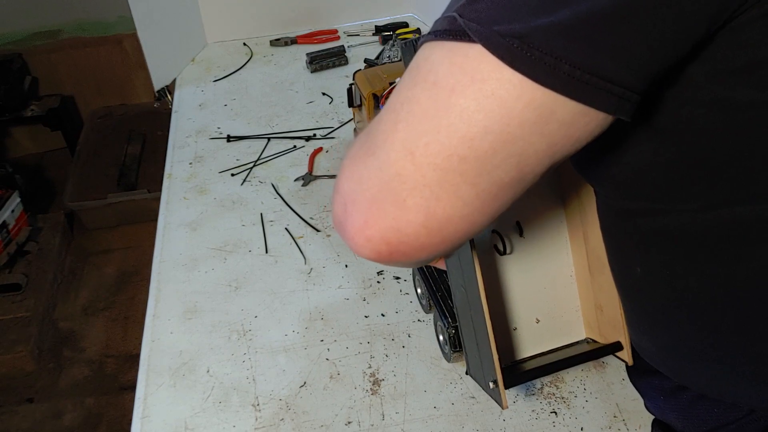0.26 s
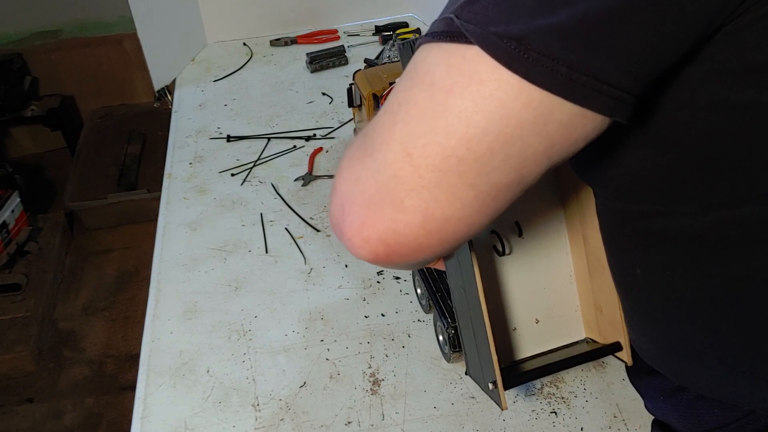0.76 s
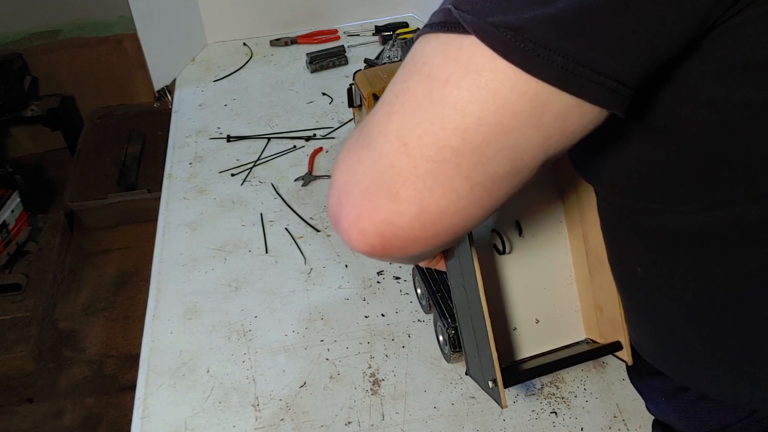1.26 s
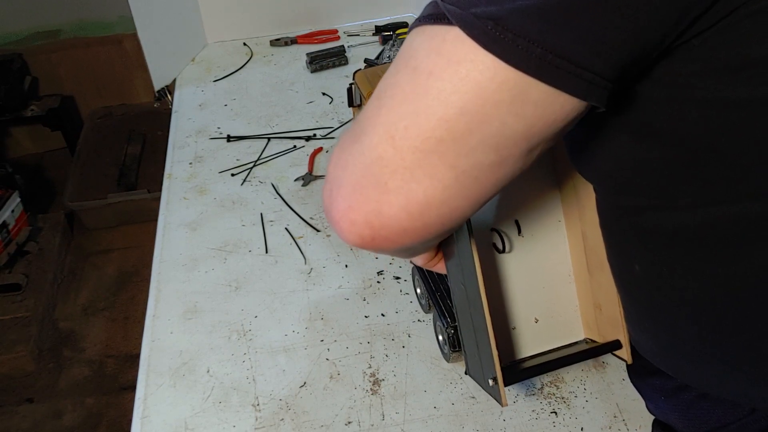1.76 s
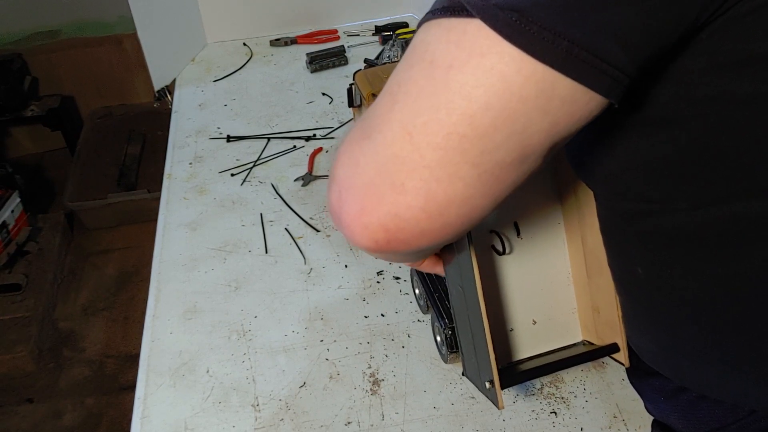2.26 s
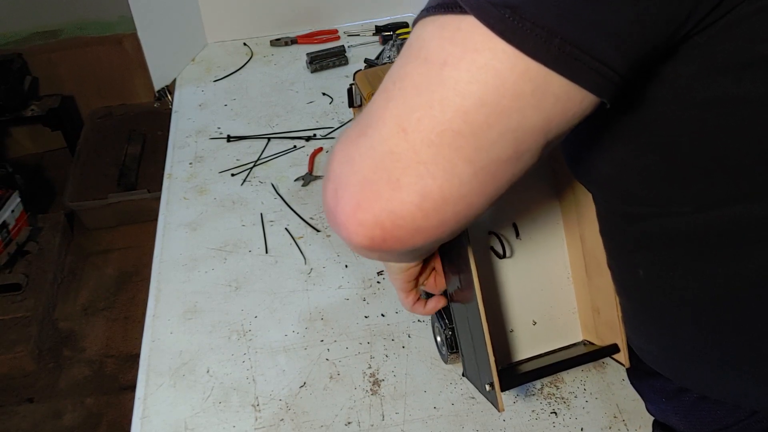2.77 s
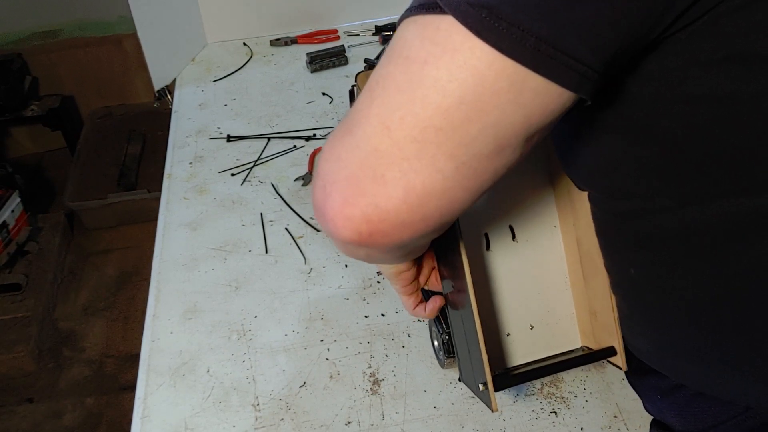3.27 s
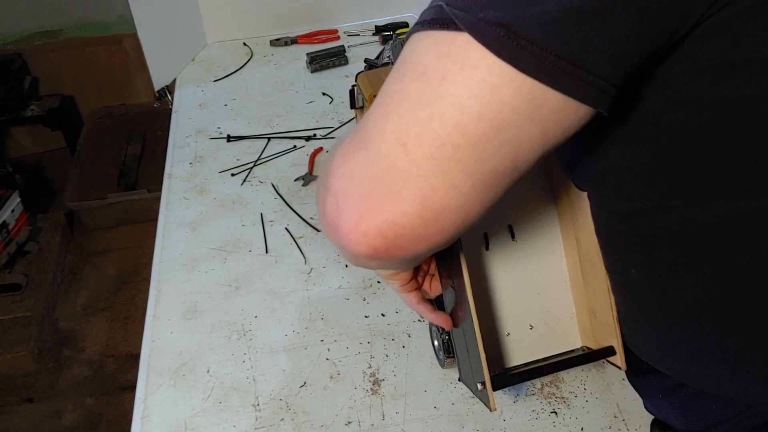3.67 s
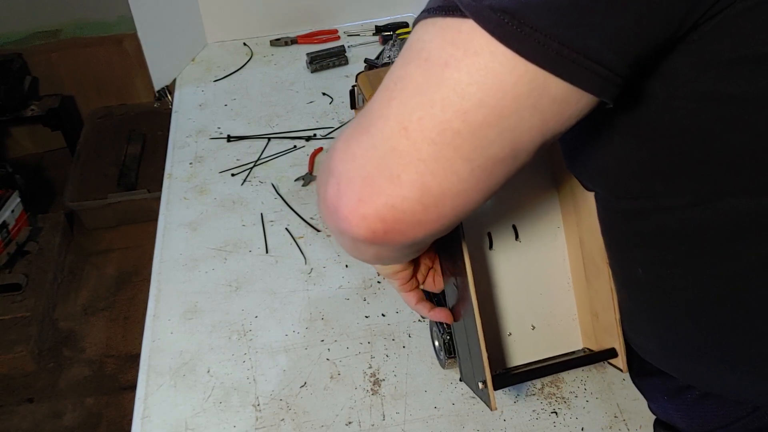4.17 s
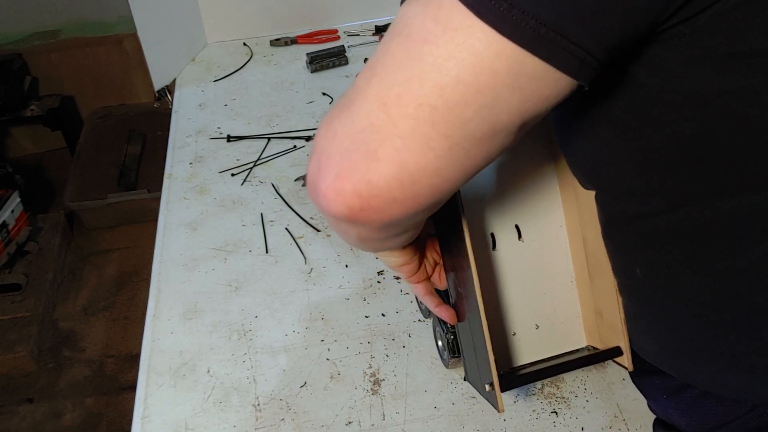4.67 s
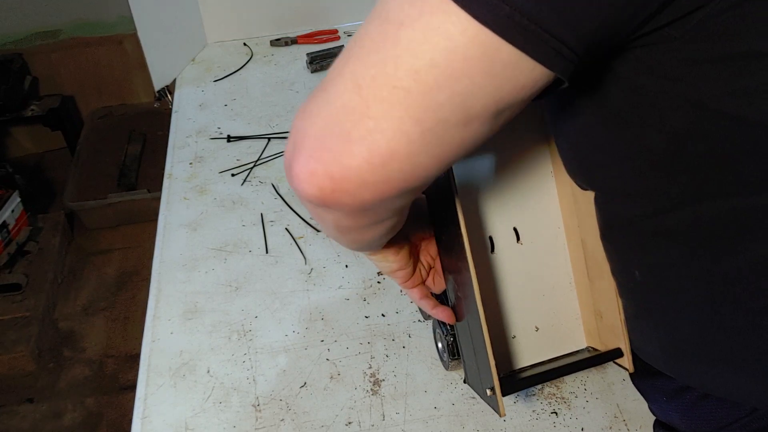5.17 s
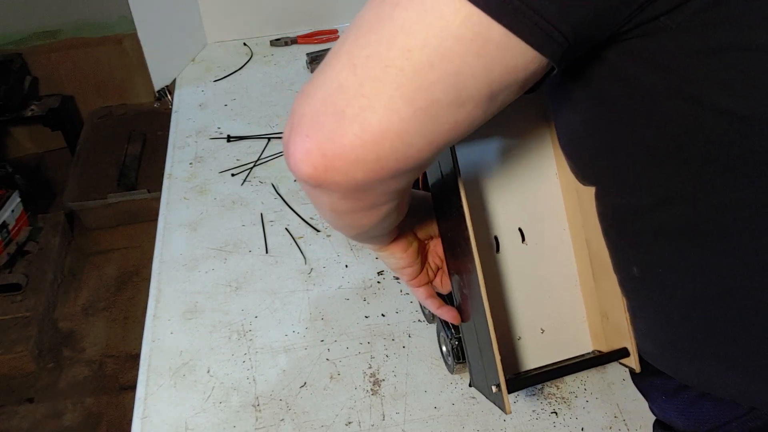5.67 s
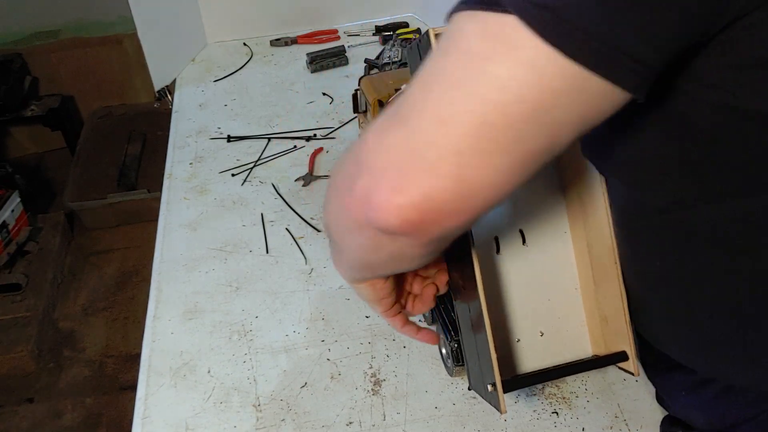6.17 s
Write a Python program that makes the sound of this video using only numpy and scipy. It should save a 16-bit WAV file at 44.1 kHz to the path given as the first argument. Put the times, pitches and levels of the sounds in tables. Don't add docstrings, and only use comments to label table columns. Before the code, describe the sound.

Very close, in a small room with faint hiss and short, cut-off tails. At 0 s a fast nylon zip lasts under a tenth of a second, followed by hard single clicks at 0.1 and 0.24. Light rubbing and a soft box knock fill the gap. From 0.8 to 1.25 a bright ratchet pull starts haltingly, runs fast, then slows tooth by tooth. Clicks at 1.4 and 1.5, a quick cluster at 1.7 and a hollow clack at 1.8 follow; another snap comes at 2.1, then faint finger rubs. At 2.86 the hardest zip bursts for about 0.15 s, squealing up and down over a low bench thump. Afterwards it is quiet: clicks around 3.75, a woody knock at 4.2, small rattles and arm thuds until 5.3. A short hollow scrape with three clacks comes at 5.36, then sparse rubs and ticks to 6.4.

```python
import sys
import numpy as np
from scipy import signal
from scipy.fft import rfft, irfft
from scipy.io import wavfile
from scipy.ndimage import uniform_filter1d, map_coordinates

SR = 44100
rng = np.random.default_rng(int(sys.argv[2]) if len(sys.argv) > 2 else 0)


def transcribe(signal):
    frames = np.atleast_2d(signal).T
    limited = np.clip(frames, -1, 1)
    pcm = np.round(limited * 32767).astype(np.int16)
    wavfile.write(sys.argv[1], SR, pcm)


def rack_gain(trim_db):
    fader = np.asarray(trim_db, float)
    return 10 ** (fader / 20)


N = 282681

# (time [s], rate [teeth/s], snap [dB], strain on truck [dB])
FULL_SPEED_PULLS = [
    [(2.9048, 320, -12, -12), (2.925, 334, -11, -12), (2.945, 300, -14, -14), (2.965, 264, -16, -13),
     (2.99, 204, -27, -8)],
]
# (frequency [Hz], density [dB/Hz])
SNAP_SPECTRUM = [(2530, -54.5), (4300, -17), (5240, -4.5), (5860, -8), (6410, -10.5), (6930, -1),
                 (7750, -4.5), (8110, -1.5), (9440, -13.5), (11500, -30.5), (15000, -53), (22000, -120)]
FIZZ_SPECTRUM = [(6350, -33), (10800, 0), (13800, -4), (15100, -6), (16000, -8)]
SHELL_SPECTRUM = [(620, -39.5), (1050, -14), (1090, -4.5), (1420, 1), (2110, 0), (2540, 0), (3020, -0.5),
                  (4800, -3.5), (6240, -28), (10600, -120)]
BOX_SPECTRUM = [(150, -44), (250, -15), (300, -20), (414, -3.5), (453, -4.5), (623, -8), (673, -7.5),
                (789, -5), (908, -6.5), (1150, -18.5), (1500, -59), (2530, -120)]
SKIN_SPECTRUM = [(2530, -48), (4300, -18.5), (5700, -11), (6140, -10.5), (7630, -1), (10100, -21.5),
                 (11100, -35.5), (13000, -43.5)]
SWAY_SPECTRUM = [(12, -38.5), (20, -5), (54, 0.5), (65, 1), (81, -8), (110, -9), (140, -30.5), (240, -120)]
THUD_SPECTRUM = [(56, -43), (95, -18), (161, 2.5), (225, 1), (269, -12), (320, -1), (420, -32), (700, -120)]
HISS_SPECTRUM = [(60, -31.5), (100, -5.5), (400, -8.5), (1500, -14.5), (5000, -21.5), (7600, -6),
                 (9500, -15), (16000, -19)]
# (frequency [Hz], width [Hz], gain [dB])
NYLON_MODES = [(6150, 200, 5), (6500, 500, 7), (7280, 500, 3), (7900, 300, 0), (9600, 400, 6)]
PLASTIC_MODES = [(1466, 90, 3), (1740, 37, 6.5), (2170, 100, 5), (2977, 74, 5), (3900, 78, 5)]
PLY_MODES = [(450, 20, 4), (530, 40, 3), (681, 30, 4), (887, 35, 4)]
# (delay [s], level [dB])
ECHOES = [(.0024, -9), (.0045, -4), (.009, -7), (.0135, -9), (.021, -12)]
# (time [s], shell [Hz], box [Hz])
GRIP = [(0.03, 4280, 570), (0.12, 3100, 880), (0.3, 3950, 473), (0.67, 1744, 640), (0.83, 4610, 452),
        (0.95, 3950, 634), (1.08, 4170, 517), (1.22, 5000, 670.4), (1.4, 1740, 549), (1.53, 4150, 560),
        (1.72, 1690, 530), (1.951, 1550, 694), (2.11, 3200, 970), (2.4, 3250, 483), (2.66, 1794, 444),
        (2.895, 4080, 462), (2.945, 1992, 931.3), (3.0, 1900, 458.4), (3.5, 3540, 400), (3.718, 4010, 455),
        (3.778, 3540, 872), (4.0, 1914, 557), (4.1, 2500, 600), (4.19, 1670, 596), (4.55, 1682, 491),
        (4.8, 3045, 1127), (4.92, 1705, 530), (5.0, 1460, 907), (5.09, 1676, 446.5), (5.37, 1397, 573.5),
        (5.57, 3900, 600), (5.65, 1600, 600), (5.74, 3800, 700), (6.0, 2100, 500), (6.2, 3000, 450)]
# (time [s], frequency [Hz])
STRAP_RING = [(0.03, 7350), (.24, 7250), (.5, 7600), (.95, 7830), (1.03, 7860), (1.09, 7550), (1.17, 7480),
              (1.4, 7500), (1.75, 7850), (2.1, 7850), (2.32, 7500), (2.55, 7400), (2.87, 7500),
              (2.93, 7950), (2.96, 7400), (3.6, 7600), (4.1, 7400), (4.9, 7500), (5.37, 7800), (5.57, 7850),
              (5.64, 8150), (5.76, 8600), (6.02, 7400), (6.38, 7800)]
# (start [s], end [s])
TAUT_PULLS = [
    (.86, 1.25),
]
# (time [s], snap peak [dB], box, shell, fizz re snap [dB])
SINGLE_TEETH = [(0, -9, -25, -15, -26), (0.1093, -5, -22, -16, -29), (0.236, -2, -21, -16, -34),
                (0.8132, -7.5, -26, -15, -33), (0.8749, -1.5, -32, -21, -29),
                (1.3853, -10.5, -9.5, -8.5, -32), (1.5131, -10, -22, -12, -42),
                (1.6883, -10, -16, -14, -38), (1.7143, -11, -13, -14, -30), (1.7376, -8.5, -18, -18.5, -22),
                (1.7634, -7.5, -17, -15, -22), (1.8182, -27, -3.5, -8, -31),
                (2.1039, -13, -33.5, -17.5, -35), (2.8556, -3, -23, -19, -31),
                (3.7114, -27, -23, -11.5, -29), (3.7531, -10.5, -15, -13.5, -30),
                (3.7998, -10.5, -21, -13.5, -28), (3.8062, -17, -21, -15, -30),
                (3.8202, -19, -15, -25.5, -30), (5.3517, -18.5, -8, -13.5, -28),
                (5.3695, -22, -6, -13, -33), (5.3875, -23, -6, -13, -33)]
# (time [s], snap [dB], strain on truck [dB], fizz re snap [dB])
RUNNING_TEETH = [(0.0016, -8, -23, -22), (0.0059, -8, -22, -22), (0.0106, -8, -21, -22),
                 (0.0157, -8, -21, -22), (0.0194, -9, -20, -22), (0.0235, -9, -20, -22),
                 (0.0277, -8, -19, -22), (0.0343, -9, -19, -22), (0.0389, -9, -18, -22),
                 (0.0445, -13, -18, -22), (0.0499, -13, -17, -22), (0.0525, -13, -17, -22),
                 (0.0581, -12, -17, -22), (0.0628, -13, -16, -22), (0.9767, -6, -31, -19),
                 (0.987, -8, -30, -19), (0.997, -6, -30, -19), (1.0072, -6, -29, -19),
                 (1.0151, -6, -29, -19), (1.0225, -8, -28, -19), (1.0276, -5, -28, -19),
                 (1.0324, -5, -28, -19), (1.0378, -4, -28, -19), (1.0424, -3, -27, -19),
                 (1.0485, -6, -27, -19), (1.0589, -8, -26, -19), (1.0685, -5, -25, -19),
                 (1.0769, -4, -24, -19), (1.0874, -4, -22, -19), (1.0925, -7, -22, -19),
                 (1.0971, -3, -22, -19), (2.8598, -7, -20, -22), (2.8641, -6, -18, -22),
                 (2.8683, -7, -17, -22), (2.8726, -6, -15, -22), (2.8762, -8, -14, -22),
                 (2.8797, -6, -13, -22), (2.8837, -8, -13, -22), (2.8878, -6, -13, -22),
                 (2.8905, -7, -13, -22), (2.8946, -9, -12, -22), (2.8975, -9, -12, -22),
                 (2.9015, -10, -12, -22)]
# (time [s], snap peak [dB])
STALLING_TEETH = [(0.9133, -6.5), (0.9255, -7.5), (0.934, -6), (0.9504, -6), (0.9654, -5.5), (1.1084, -3.5),
                  (1.1183, -4), (1.1325, -3.5), (1.1471, -4), (1.1647, -2), (1.1863, -4.5), (1.2038, -4.5),
                  (1.2186, -4), (1.2368, -3.5)]
# (time [s], snap peak [dB], box, shell re snap [dB])
TICKS = [(0.4022, -40.5, -10, -19.5), (0.472, -46.5, -14, -17.5), (0.8024, -21, -9, -9),
         (2.1425, -27.5, -24.5, -34), (2.2811, -34, -26, -17), (2.4134, -43.5, -34.5, -35),
         (2.5226, -44.5, -10, -16.5), (3.6172, -31.5, -31.5, -15.5), (3.6546, -30, -38, -28),
         (4.241, -37, -13, -11), (5.5605, -45.5, -17, -20), (4.33, -52, -25, -25), (6.341, -52, -25, -25),
         (5.7177, -39.5, -28.5, -20), (5.747, -43, -17, -25), (5.9743, -38.5, -19, -16),
         (5.9985, -30, -22, -15.5), (6.0595, -39.5, -18, -21), (6.3752, -33, -33.5, -29)]
# (time [s], box peak [dB], shell re box [dB])
KNOCKS = [(0.6589, -38, -9), (1.9914, -54, -2), (2.6478, -52.5, -7), (4.1751, -28, -12.5),
          (4.3985, -51.5, -21.5), (4.6965, -41.5, -31), (4.8356, -38.5, -9), (4.9187, -37.5, -8),
          (4.9864, -42, -25), (5.086, -62, 4), (5.2864, -48, -14), (5.954, -56, -3)]
# (time [s], hold [s], sway [dB], thud [dB])
LEANS = [(0.0, 0.037, -65, -50), (0.237, 0.017, -59.5, -55), (0.38, 0.022, -61.5, -72.5),
         (0.815, 0.087, -75.5, -65), (1.04, 0.045, -79, -49.5), (1.191, .03, -56, -59),
         (1.385, 0.015, -67, -54), (1.723, 0.086, -64.5, -53), (1.993, 0.07, -68, -66),
         (2.3, 0.044, -74, -73.5), (2.899, .08, -65, -46.5), (2.986, 0.072, -51, -44.5),
         (3.836, 0.028, -63.5, -58), (4.185, 0.022, -66, -62), (4.43, 0.0089, -68, -59.5),
         (4.77, .05, -49.5, -58.5), (5.432, 0.012, -58, -46), (5.597, .05, -59.5, -81),
         (5.82, 0.023, -71.5, -60), (6.108, .02, -60.5, -73.5), (6.4, .02, -71.5, -69)]
# (time [s], hold [s], hiss [dB], shell, box re hiss [dB])
SLIDES = [(0.358, 0.011, -51.5, -19, -0.5), (0.479, .02, -58, -15, -8), (0.788, .01, -65, -7, 2),
          (1.996, 0.12, -53.5, -6, -7), (2.099, .01, -42, -20, -17), (2.276, 0.076, -44.5, -14.5, -13),
          (2.526, 0.046, -50, -19.5, -13), (2.736, .01, -52.5, -21, -20.5), (2.79, .01, -60, -5.5, -5),
          (3.62, .01, -46.5, -12, -17.5), (3.993, 0.056, -60.5, -7.5, -8.5), (4.095, 0.034, -49, -3, -25),
          (4.801, 0.072, -52.5, -2.5, -2.5), (4.885, .03, -46, -6.5, 0), (5.56, 0.032, -54, -17, -12),
          (5.638, .006, -35, -25, -25), (5.655, .015, -45, -22, -22), (3.51, .04, -58, -8, -15),
          (.545, .03, -58, -18, -4), (3.71, .03, -38, -12, -20), (4.785, .02, -52, -2, -8),
          (4.95, .04, -54, -8, -8), (5.752, 0.039, -48, -15, -9), (2.24, .03, -56, -12, -8),
          (2.6, .12, -64, -6, -2), (5.902, .03, -70, -5, -2.5), (6.18, .04, -72, -4, 4),
          (6.003, 0.039, -37, -11.5, -15), (6.386, 0.0091, -51.5, -16.5, -19.5)]
# (time [s], hold [s], box [dB], shell, hiss re box [dB])
DRAGS = [(0.665, 0.009, -53.5, -1.5, -2), (1.872, 0.14, -52, -10.5, -11.5),
         (2.643, 0.0066, -56.5, -6.5, -13), (3.03, .06, -40, -5.5, -11), (3.458, .02, -50.5, -11.5, -16),
         (3.71, 0.011, -41.5, -7, -11), (3.944, .02, -57.5, -4.5, -8.5), (4.186, 0.02, -42, -14, -28),
         (4.238, 0.0068, -46.5, -7, -11.5), (4.406, .03, -62.5, -23.5, -11.5), (4.701, 0.11, -52, -11, -14),
         (4.972, 0.0084, -52.5, -7.5, -15.5), (5.084, .004, -70, 0, -10), (5.289, .03, -53.5, -11.5, -13.5),
         (5.357, .035, -28.5, -5, 1)]
# (time [s], rate [slips/s], partials 1, 2, 3 [dB])
SQUEAL = [
    (2.885, 450.5, -35, -37, -48),
    (2.899, 473.3, -17, -29, -37),
    (2.909, 639.1, -32, -43, -41),
    (2.925, 942.3, -19, -35, -36),
    (2.939, 1041, -30, -29, -28),
    (2.957, 873.3, -25, -38, -50),
    (2.975, 845.1, -40, -49, -47),
    (2.985, 497.3, -27, -44, -51),
    (3.015, 442.6, -40, -48, -54),
]

LEAD_SAMPLES = 1100
ZIP_SHELL_DB, SHELL_DB_PER_STRAIN_DB = -8.5, .4


def unit(x):
    return x / np.sqrt(np.mean(x ** 2) + 1e-20)


def body(points, modes=()):
    hz = np.fft.rfftfreq(16384, 1 / SR)
    point_hz, point_db = np.transpose(points)
    level_db = np.maximum(np.interp(np.log(hz + 1), np.log(point_hz + 1), point_db), -70)
    for centre_hz, width_hz, gain_db in modes:
        level_db = level_db + gain_db / (1 + (2 * (hz - centre_hz) / width_hz) ** 2)
    cepstrum = irfft(np.log(rack_gain(level_db)))
    cepstrum[1:len(hz) - 1] *= 2
    cepstrum[len(hz):] = 0
    h = irfft(np.exp(rfft(cepstrum)))[:len(hz)]
    return h / np.linalg.norm(h)


def through(x, h):
    return signal.fftconvolve(x, h[None], axes=1)[:, :N]


def stereo(pair, alike):
    angle = np.arccos(np.clip(alike, -1, 1)) / 2
    mid = np.cos(angle) * pair[..., 0, :]
    side = np.sin(angle) * pair[..., 1, :]
    return np.stack([mid + side, mid - side], axis=-2)


def noise(alike, patchy_db=0):
    z = signal.stft(rng.standard_normal((2, N)), nperseg=512)[2]
    field = uniform_filter1d(rng.standard_normal(z.shape[1:]), size=3, axis=0)
    field = uniform_filter1d(field, size=9, axis=1)
    patched = signal.istft(z * rack_gain(patchy_db * unit(field)), nperseg=512)[1][:, :N]
    return unit(stereo(patched, alike))


def single_teeth():
    stalling = [(*row, -27.5, -24.5, -18) for row in STALLING_TEETH]
    return list(SINGLE_TEETH) + stalling


def running_teeth():
    return [(s, snap_db + 1.5, strain_db - 5, ZIP_SHELL_DB + SHELL_DB_PER_STRAIN_DB * strain_db, fizz_db)
            for s, snap_db, strain_db, fizz_db in RUNNING_TEETH]


def loose_ticks():
    return [(*row, -36) for row in TICKS]


def box_knocks():
    edge_db, fizz_db = -19.5, -24
    return [(s, box_db + edge_db, -edge_db, shell_db - edge_db, fizz_db) for s, box_db, shell_db in KNOCKS]


def zip_teeth(rows):
    s, rate, snap_db, strain_db = np.transpose(rows)
    t = np.arange(s[0], s[-1], 1 / SR)
    pitches = np.floor(np.cumsum(np.interp(t, s, rate)) / SR)
    at = t[np.r_[0, np.flatnonzero(np.diff(pitches))]]
    luck = rng.standard_normal((50, 2))[:len(at)]
    speed, snap, strain = (np.interp(at, s, column) for column in (rate, snap_db, strain_db))
    return np.transpose([at + .0002 * luck[:, 0], snap + 1.1 * luck[:, 1], strain,
                         ZIP_SHELL_DB + SHELL_DB_PER_STRAIN_DB * strain, -22.5 + .024 * speed])


def outline(burst_s, echo_db, room_db, t60_s, cut_s, smear_db, soft=1):
    t = (np.arange(SR // 4) - LEAD_SAMPLES) / SR
    early = t[LEAD_SAMPLES:LEAD_SAMPLES + SR // 25]

    def crack(u):
        attack = 1 - np.exp(-np.abs(u) / 0.0004 / soft)
        return (u > 0) * attack * np.exp(-np.abs(u / burst_s / soft) ** 3)

    tail_db = room_db - 60 * t / t60_s - 20 * np.abs(t / cut_s) ** 3
    power = (t > 0) * (1 - np.exp(-np.abs(t) / .001 / soft)) * rack_gain(2 * tail_db)
    echoes = sum(rack_gain(2 * (db + echo_db)) * crack(early - delay) for delay, db in ECHOES)
    power[..., LEAD_SAMPLES:LEAD_SAMPLES + len(early)] += crack(early) + echoes
    smear = (t < 0) * rack_gain(2 * smear_db) * (1 + t * SR / LEAD_SAMPLES)
    return np.sqrt(power + smear)


def struck(s, db, waves, h):
    out = np.zeros((2, N + SR))
    for at, gain, wave in zip(np.round(s * SR).astype(int), rack_gain(db), waves):
        out[:, at:at + wave.shape[1]] += gain * wave
    return through(out[:, LEAD_SAMPLES:LEAD_SAMPLES + N], h)


def strap_bursts(s, pair):
    t = np.arange(LEAD_SAMPLES + 170) / SR
    hz = np.interp(s, *np.transpose(STRAP_RING))[:, None, None] + 70 * rng.standard_normal((len(s), 1, 1))
    turn = rng.random((len(s), 1, 1)) + [[-.08], [.08]] + .05 * rng.standard_normal((len(s), 2, 1))
    taut = np.any([(s > a) & (s < b) for a, b in TAUT_PULLS], axis=0)[:, None, None]
    bright = stereo(pair, .0)
    bright[..., LEAD_SAMPLES:len(t)] *= np.where(taut, .4, .68)
    ring = np.sin(2 * np.pi * (hz * t + turn)) * (t > LEAD_SAMPLES / SR)
    bright[..., :len(t)] += np.where(taut, .8, .45) * ring
    return bright


def ties():
    listed = single_teeth() + loose_ticks() + box_knocks() + running_teeth()
    s, db, box_db, shell_db, fizz_db = np.vstack([listed] + [zip_teeth(z) for z in FULL_SPEED_PULLS]).T
    hand = (s * 5).astype(int)
    paths = rng.standard_normal((40, 2, SR // 4))[hand]
    same = .8
    pair = np.sqrt(same) * paths + np.sqrt(1 - same) * rng.standard_normal(paths.shape)
    gate = np.clip(1 + db / 90, .4, 1)[:, None, None]
    soft = 1 + .3 * np.maximum(-36 - db, 0)[:, None, None]

    snap = strap_bursts(s, pair) * outline(0.0023, -1, -11.5, 0.46, .125 * gate, -41, soft)
    snap = struck(s, db - 6.0, snap, body(SNAP_SPECTRUM, NYLON_MODES)) * rack_gain([[-.5], [.5]])
    fizz = stereo(pair, 0.11) * outline(0.0017, -3.2, -11.5, 0.19, 0.1 * gate, -41.5)
    fizz = struck(s, db + fizz_db + 3, fizz, body(FIZZ_SPECTRUM))
    shell = stereo(pair, 0.44) * outline(0.003, -4.5, -8, 0.27, 0.16 * gate, -40, soft)
    shell = struck(s, db + shell_db - 3.5, shell, body(SHELL_SPECTRUM, PLASTIC_MODES))
    box = stereo(pair, 0.88) * outline(0.0026, -8.5, -13, 0.23, 0.079, -35.5)
    box = struck(s, db + box_db, box, body(BOX_SPECTRUM, PLY_MODES))
    return snap + fizz, shell, box


def gripped(x, table, column, size, width, db):
    hz, t, z = signal.stft(x, SR, nperseg=size)
    held = np.array(table)
    nearest = np.abs(t[:, None] - held[:, 0]).argmin(1)
    centre_hz = held[nearest, column]
    lifted = z * rack_gain(db / (1 + ((hz[:, None] / centre_hz - 1) / width) ** 2))
    lifted *= np.linalg.norm(z, axis=(0, 1)) / (np.linalg.norm(lifted, axis=(0, 1)) + 1e-12)
    return signal.istft(lifted, SR, nperseg=size)[1][:, :N]


def hiss():
    return rack_gain(-79.5) * through(noise(0.75), body(HISS_SPECTRUM))


def swells(s, hold_s, db, rise, fall, rest_db=-150, skirt_db=-150):
    t = np.arange(0, N / SR + .002, .001)[:, None]
    before = np.maximum(s - t, 0)
    after = np.maximum(t - s - hold_s, 0)
    level_db = db - np.minimum(rise * before, 220 * before - skirt_db) - fall * after
    return rack_gain(np.interp(np.arange(N) / SR, t[:, 0], np.maximum(level_db.max(1), rest_db)))


def bench():
    s, hold_s, sway_db, thud_db = np.transpose(LEANS)
    sway = unit(through(noise(.97), body(SWAY_SPECTRUM, [(54, 6.3, 4.7)])))
    thud = unit(through(noise(0.96), body(THUD_SPECTRUM)))
    sway_gain = swells(s, hold_s, sway_db, rise=170, fall=85, rest_db=-80.5)
    thud_gain = swells(s, hold_s, thud_db, rise=260, fall=140, rest_db=-84)
    return sway_gain * sway + thud_gain * thud


def strokes():
    s, hold_s, db, shell, box = np.transpose(SLIDES)
    slid = [swells(s, hold_s, db + rel, rise=1400, fall=520, skirt_db=-13) for rel in (0, shell, box)]
    s, hold_s, db, shell, skin = np.transpose(DRAGS)
    dragged = [swells(s, hold_s, db + rel, rise=1300, fall=339) for rel in (skin, shell, 0)]
    return np.maximum(slid, dragged)


def grit(rate, spread_db):
    knots_db = rng.exponential(spread_db, int(N / SR * 400))
    place = np.arange(N) * np.clip(rate, 20, 390) / SR
    return unit(rack_gain(np.interp(place, np.arange(len(knots_db)), knots_db)))


def rubbing():
    skin, shell, box = strokes()
    slips = grit(rate=70, spread_db=1.1)
    skin = skin * slips * noise(0.034, patchy_db=5.5) * rack_gain([[-1.5], [1.5]])
    shell = shell * slips * noise(0.12, patchy_db=4.5)
    box = box * grit(rate=80, spread_db=3) * noise(0.86, patchy_db=1.5)
    return (through(skin, body(SKIN_SPECTRUM)), through(shell, body(SHELL_SPECTRUM, PLASTIC_MODES)),
            through(box, body(BOX_SPECTRUM, PLY_MODES)))


def squeal():
    s, rate, *levels = np.transpose(SQUEAL)
    t = np.arange(N) / SR
    turns = np.cumsum(np.interp(t, s, rate)) / SR
    edges_db = -900 * (np.maximum(s[0] - t, 0) + np.maximum(t - s[-1], 0))
    grid = np.meshgrid(np.arange(3), t * 180, indexing="ij")
    flutter_db = 1.5 * map_coordinates(rng.standard_normal((3, 1200)), grid)
    sides = [[0], [.07]]
    return sum(rack_gain(3 + np.interp(t, s, db) + edges_db + flutter_db[k])
               * np.sin(2 * np.pi * (k + 1) * (turns + sides)) for k, db in enumerate(levels))


def scene():
    bright, shell, box = np.add(ties(), rubbing())
    truck = gripped(shell, GRIP, column=1, size=256, width=0.18, db=9.5)
    truck = truck + gripped(box, GRIP, column=2, size=1024, width=.1, db=9)
    bright = gripped(bright, STRAP_RING, column=1, size=128, width=.07, db=2.5)
    return bright + truck + squeal() + bench() + hiss()


def masked(x):
    mask_hz, mask_db, top_hz = 10300, -38.5, 16050
    hz, t, z = signal.stft(x, SR, nperseg=1024)
    power = (np.abs(z[:, :512]) ** 2).mean(0).reshape(32, 16, -1).mean(1)
    limit_db = mask_db + 2.5 * rng.standard_normal(power.shape)
    weak = np.repeat(power < power[4:].max(0) * rack_gain(2 * limit_db), 16, axis=0)
    bins_hz = hz[:512, None]
    keep = ~(weak & (bins_hz > mask_hz)) & (bins_hz < top_hz)
    return signal.istft(z * np.pad(keep, ((0, 1), (0, 0))), SR, nperseg=1024)[1][:, :N]


def top_cut(x):
    return signal.sosfilt(signal.butter(12, 16360, fs=SR, output="sos"), x)


def record(dry):
    lead = np.array([np.roll(dry[0], -1), np.roll(dry[1], 1)])
    clipped = lead / (1 + np.abs(lead / .98) ** 6) ** (1 / 6)
    mix = masked(clipped)
    return top_cut(mix)


dry = scene()
out = record(dry)
transcribe(out)
```